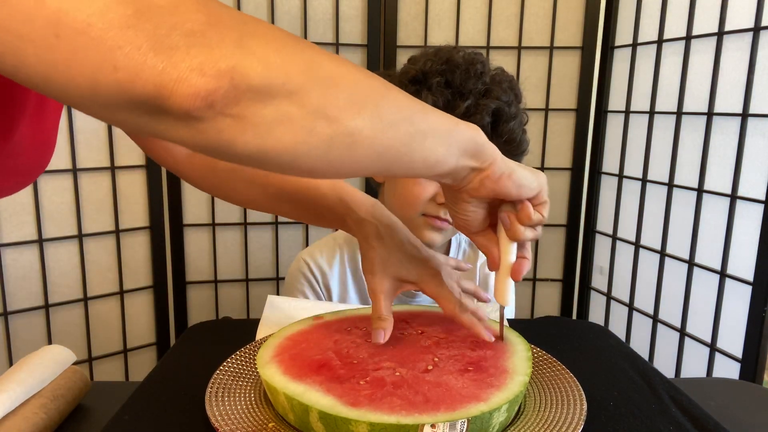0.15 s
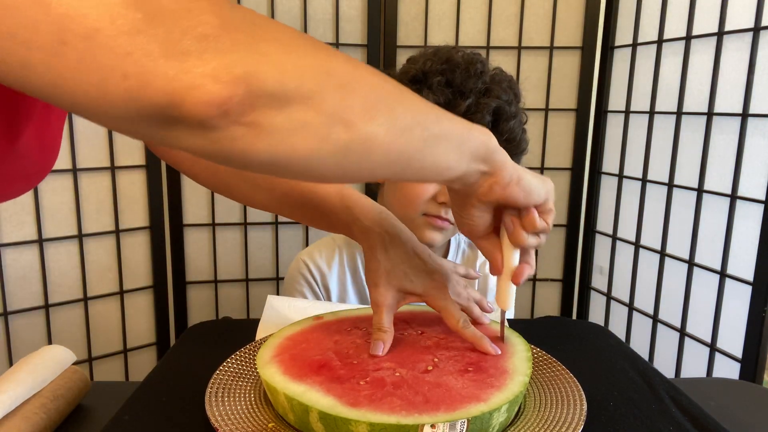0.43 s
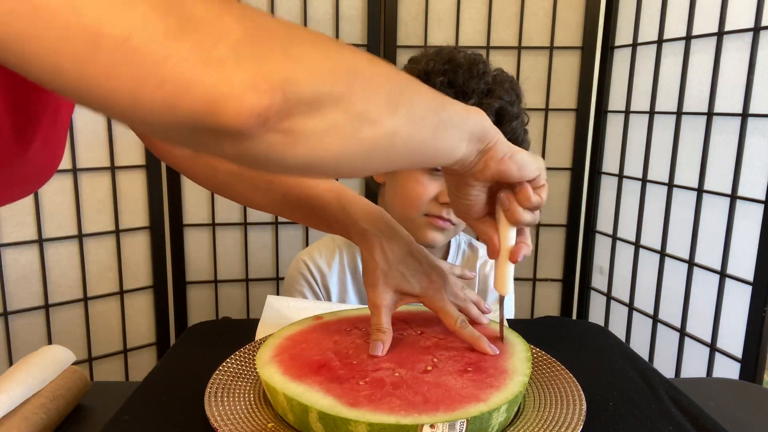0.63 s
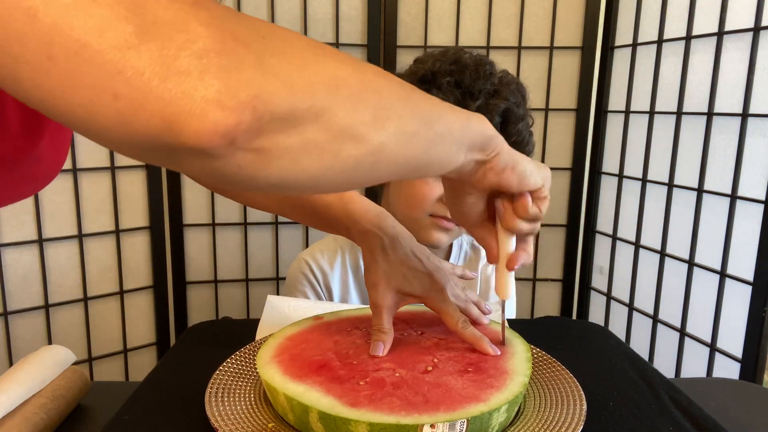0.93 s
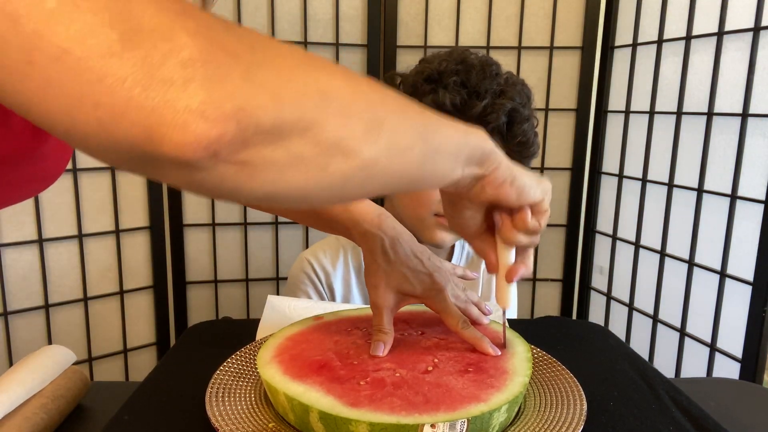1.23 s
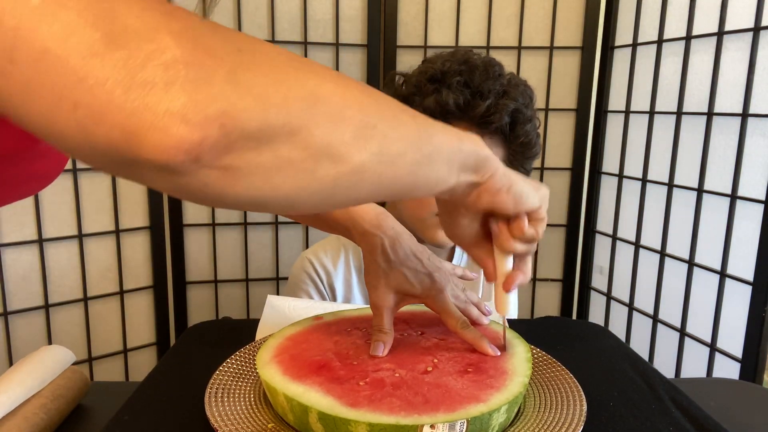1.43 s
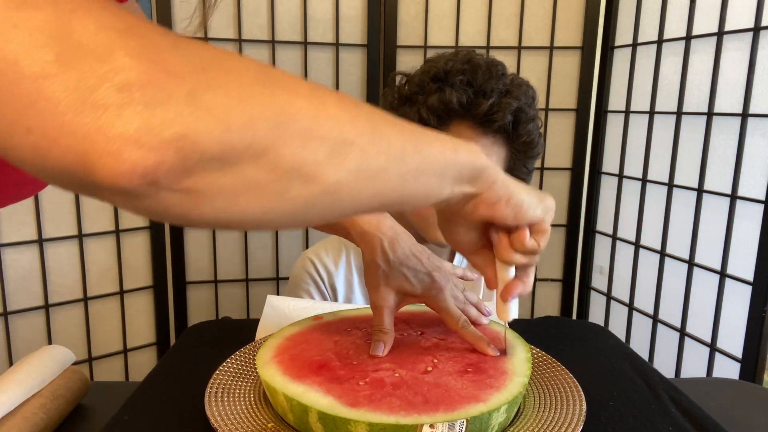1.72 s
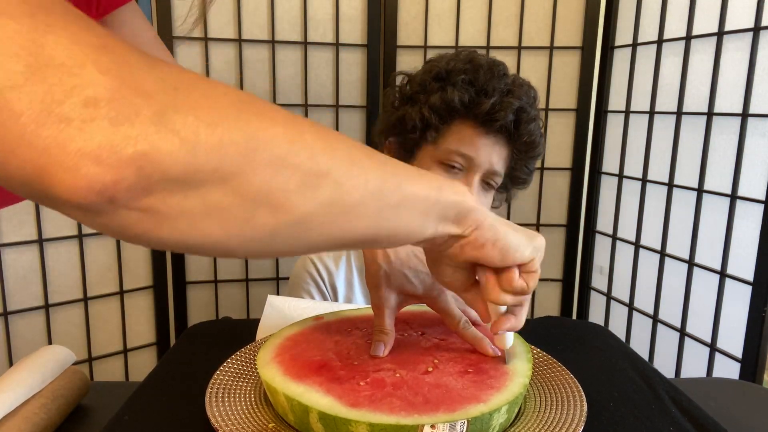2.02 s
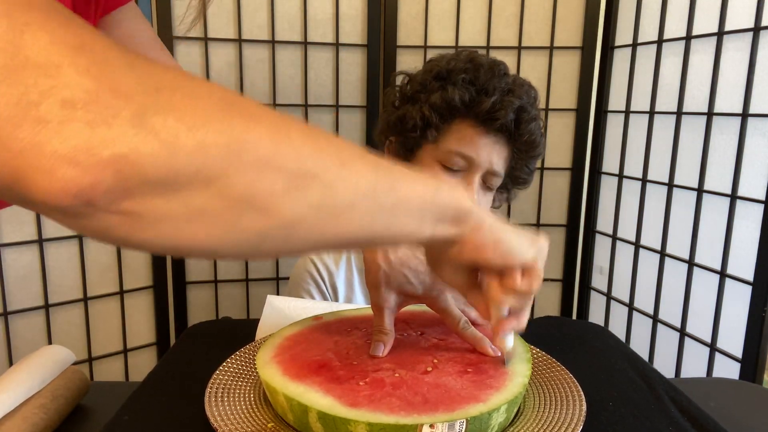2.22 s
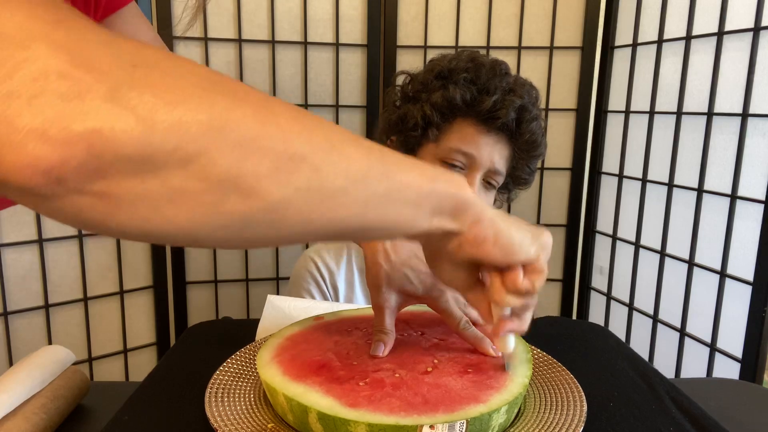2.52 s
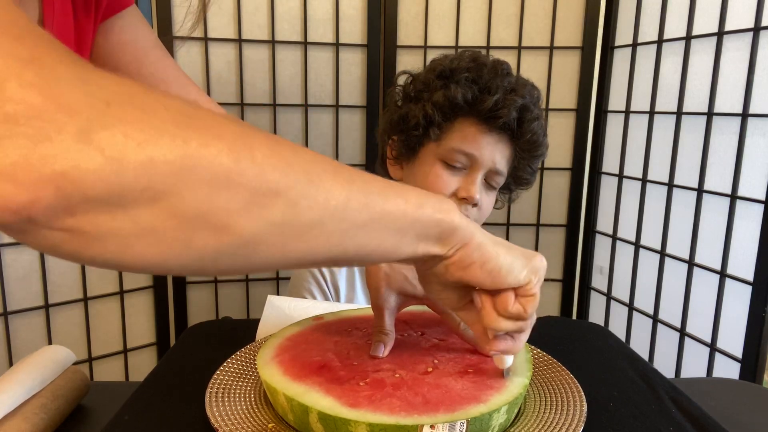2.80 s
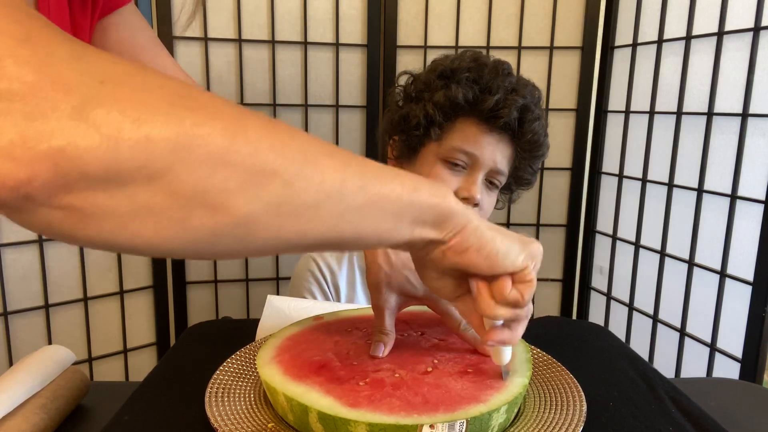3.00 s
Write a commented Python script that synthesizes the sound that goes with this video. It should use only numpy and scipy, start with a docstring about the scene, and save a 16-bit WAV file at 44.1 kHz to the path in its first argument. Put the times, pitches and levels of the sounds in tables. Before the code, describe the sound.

A knife saws through juicy watermelon, short wet rasps each ending with a hard plate knock

```python
"""A knife saws down through a watermelon slab on a plate: strokes fizz as grains of noise that swell and stop.
At most stroke ends the tip knocks the plate: clicks through damped resonances, then a short ring of chattering noise.
Thumps are fading sine waves of the table; a small room answers with early echoes and a noise tail.
Behind it, the table shakes the microphone with a wandering low tone and rumble, over quiet air noise."""
import sys
import numpy as np
from scipy import signal
from scipy.fft import rfft, irfft, next_fast_len
from scipy.io import wavfile
from scipy.ndimage import map_coordinates

SR = 44100
rng = np.random.default_rng(int(sys.argv[2]) if len(sys.argv) > 2 else 0)


def pcm_store(signal):
    """Save signal as 16-bit PCM."""
    levels = np.round(np.clip(np.atleast_2d(signal), -1, 1) * 32767)
    wavfile.write(sys.argv[1], SR, levels.astype(np.int16).T)


def volts(x):
    """Linear amplitude factor 10**(x/20) for a level x in dB, scalar or array-like."""
    e = np.asarray(x, float) / 20
    return 10 ** e


N = 138915

# knife tip on the plate: (t/s, crack blow/dB, pitch of the hollow under the slab f/Hz, hollow level/dB,
# plate ring level/dB, low knock blow/dB, click blow/dB)
KNOCKS = [(0.6655, -18.5, 1337, -44, -57, -29, -26), (0.9807, -22.5, 1240, -48.5, -51.5, -30, -27.5),
          (1.2353, -10.5, 1353, -40, -43.5, -24, -21), (1.4894, -18, 973, -41.5, -48.5, -26, -24),
          (1.7367, -17, 952, -44.5, -46.5, -20, -21), (1.962, -19, 914, -44, -43, -14, -24.5),
          (2.182, -17.5, 936, -42.5, -47, -13, -26), (2.3677, -19, 930, -45.5, -48, -12.5, -29),
          (2.744, -5, 960, -35.5, -36.5, -7.5, -18.5), (2.949, -13.5, 922, -44.5, -44, -11, -25),
          (3.131, -8.5, 955, -37, -39, -6, -23)]
# the tip lands, then skids: (delay/s, level/dB)
SKIDS = [(0, -0.5), (.0014, -5), (.0042, -16.5)]


def slices():
    """Wet cells burst ever louder as the blade speeds up, and the fizz drops away when the stroke ends."""
    # blade through flesh: (end t/s, level at the end/dB, length/s, treble boost/dB)
    strokes = [(0.672, -52.5, 0.077, 2.5), (0.882, -65, 0.075, 3.5), (0.982, -45, 0.052, 3),
               (1.145, -63.5, 0.045, 2.5), (1.238, -42.5, 0.047, 1), (1.497, -43, 0.053, -2.5),
               (1.741, -41, 0.06, -2), (1.962, -41, 0.051, -1), (2.187, -44, 0.042, -1),
               (2.39, -44.5, 0.05, 0.5), (2.59, -53.5, 0.096, -1), (2.659, -62, 0.056, 2),
               (2.749, -42.5, 0.026, 3), (2.961, -48.5, 0.048, 2), (3.14, -49, 0.037, 1)]
    # colour of the wet flesh: (f/Hz, relative level per Hz/dB)
    flesh = [(500, -21), (900, -10.5), (1500, -5), (1900, -8), (2200, -11), (2650, -3), (3200, -8.5),
             (4000, -9.5), (7000, -13.5), (11000, -16.5), (16000, -27)]
    lead_s, release_s = 0.035, 0.0093  # faint start before the swell; quick fade after the end
    swell_db, swell_share = 17.5, 0.6  # rise from entry; most of it takes this share of the stroke
    treble_hz = 4200
    ragged_db, ragged_per_s = 3.1, 170  # uneven tearing
    t = np.arange(N) / SR
    fizz = coloured(grains(9000, spread_db=2), flesh)
    fizz = fizz * volts(ragged_db * wobble(ragged_per_s))
    treble = filtered(fizz, lambda hz: 1 / (1 + (treble_hz / (hz + 1)) ** 4))
    out = np.zeros(N)
    for end, db, length, bright_db in strokes:
        times = [end - length - lead_s, end - length, end - (1 - swell_share) * length, end, end + release_s]
        swell = np.interp(t, times, [-40, -swell_db, -3, 0, -30], left=-200, right=-200)
        out += volts(db + swell) * (fizz + (volts(bright_db) - 1) * treble)
    return out


def juice_ticks():
    """Small wet clicks as the tip is set in, each a landing and one skid through high resonances."""
    # juice ticks: (t/s, blow/dB)
    ticks = [(0.0952, -70), (0.1595, -60), (0.183, -61), (0.1964, -61), (0.414, -59), (0.4598, -59.5),
             (0.5628, -57), (0.5802, -49.5), (2.7235, -57)]
    # wet click resonances: (f/Hz, width/Hz, level/dB)
    wet_click = [(6900, 8300, 1), (12200, 5000, 6)]
    return cracks(ticks, wet_click, SKIDS[:2])


def edge_clicks():
    """The steel edge clicks at each knock: one sharp blow through broad, high resonances."""
    # steel edge resonances: (f/Hz, width/Hz, level/dB)
    edge = [(5140, 2130, 2), (8770, 10400, -1.5), (12000, 6400, -2.5)]
    return cracks([(k[0], k[-1]) for k in KNOCKS], edge, SKIDS[:1])


def knocks(skids):
    """The tip cracks on the plate and sounds the hollow under the slab; a wall echoes the knock."""
    # broad crack: (f/Hz, width/Hz, level/dB)
    crack_bands = [(1822, 543, 2.5), (3580, 2000, -4.5)]
    # upper note of the crack, its blow following the plate's ring level: (f/Hz, width/Hz, level/dB)
    upper_crack = [(2610, 380, 0.0066)]
    # a low 700 Hz echo of the knock off a wall, 13 ms later: (f/Hz, width/Hz, level/dB)
    echo = [(699, 120, 0)]
    upper_db, echo_db, low_db = 37.5, 32.5, 5  # blows over the ring, hollow and low knock columns
    echo_s = 0.013
    low_width = 0.3  # share of the hollow's pitch
    landing = skids[:1]
    out = cracks(KNOCKS, crack_bands, skids, order=2)
    out += cracks([(k[0], k[4] + upper_db) for k in KNOCKS], upper_crack, landing, order=2)
    out += cracks([(k[0] + echo_s, k[3] + echo_db) for k in KNOCKS], echo, landing)
    for s, _, hz, _, _, db, _ in KNOCKS:
        out += cracks([(s, db + low_db)], [(hz, low_width * hz, 0)], landing, order=2)
    return out


def cracks(events, peaks, skids, order=1):
    """Each contact is one or more clicks milliseconds apart through damped resonances; order 2 starts softer."""
    blows = np.zeros(N)
    for event, chance in zip(events, rng.standard_normal((len(events), len(skids), 2))):
        for (lag_s, db), (late, louder) in zip(skids, chance):
            start = event[0] + lag_s * (1 + 0.15 * late)
            blows[round(start * SR)] += volts(event[1] + db + 1.5 * louder)
    return volts(17) * filtered(blows, lambda f: resonances(peaks)(f) ** order)


def plate():
    """After each knock the plate chatters in fixed bands, and the slab's hollow mostly sounds lower over time."""
    # plate bands: (f/Hz, width/Hz, level/dB)
    plate_bands = [(1910, 82, -0.5), (2240, 90, 0), (2510, 140, 6), (2680, 116, 3), (2970, 90, 3),
                   (3164, 340, 0.5)]
    # slab over the plate: (multiple of the hollow's pitch, width as share of that pitch, level/dB)
    hollow = [(0.75, 0.18, 1.5), (1, 0.17, 6.5), (1.27, 0.7, 1)]
    # the slab's low body, the same at every knock: (f/Hz, width/Hz, level/dB)
    body = [(626, 267, 0)]
    body_db = -4  # against the hollow
    body_t60, hollow_t60, plate_t60 = 0.3, 0.46, 0.27  # s to fall by 60 dB, apart from the louder start
    rise_s, first_s, first_db = 0.0049, 0.023, 10.5  # soft onset, then a louder start that fades
    out, t = np.zeros(N + SR), np.arange(SR // 2) / SR
    rise = (1 - np.exp(-t / rise_s)) * volts(first_db * np.exp(-t / first_s))
    drive = grains(2500, spread_db=3)
    for s, _, hz, hollow_db, ring_db, *_ in KNOCKS:
        start = round(s * SR)
        push = drive[start - len(t):][:len(t)]
        hollow_bands = [(hz * k, hz * w, g) for k, w, g in hollow]
        parts = [(hollow_db + body_db, body_t60, body), (hollow_db, hollow_t60, hollow_bands),
                 (ring_db, plate_t60, plate_bands)]
        for db, t60, peaks in parts:
            push = push[::-1]  # turned around so that neighbouring parts chatter differently
            chatter = unit(filtered(push, lambda f: resonances(peaks)(f) ** 2))
            out[start:][:len(t)] += volts(db - 60 * t / t60) * rise * chatter
    return out[:N]


def thumps():
    """Soft pushes ring the table top as a few low sine waves, each fading at its own rate."""
    # table thumps: (t/s, base level/dB, base time to fall by 60 dB/s)
    pushes = [(.664, -36.5, 0.077), (.98, -40, 0.056), (1.202, -40, 0.058), (1.237, -35, 0.054),
              (1.346, -38.5, 0.054), (1.488, -32, 0.075), (1.619, -37.5, 0.038), (1.738, -33.5, 0.065),
              (1.961, -32.5, 0.074), (2.182, -35.5, 0.087), (2.345, -42, 0.044), (2.368, -35.5, 0.076),
              (2.519, -42, 0.049), (2.745, -34.5, 0.075), (2.86, -41, 0.042), (2.949, -37.5, 0.079),
              (3.132, -35.5, .08)]
    # table tones: (f/Hz, level against the base/dB, share of the base fall time)
    table_tones = [(145.7, -3.5, 1.44), (197, 2, 1.16), (253.3, 7, 0.92), (321, -0.65, 0.88),
                   (432, -1.5, 0.3), (532, -8.5, 0.46)]
    out = np.zeros(N)
    chances = rng.standard_normal((len(pushes), len(table_tones), 2))
    for (s, db, t60), chance in zip(pushes, chances):
        t = time_since(s)
        ring = np.zeros(N)
        for (hz, level, share), (louder, turn) in zip(table_tones, chance):
            fade = volts(db + level + 2 * louder - 60 * t / (share * t60))
            ring += fade * np.sin(2 * np.pi * hz * t + 0.4 * turn)  # scattered phase, radians
        out += (1 - np.exp(-t / (0.05 * t60))) * ring  # soft onset
    return out


def room(x, count=11):
    """Early wall echoes and a tail dying by frequency, drawn anew for each of count stretches of time."""
    # wall echoes: (delay/s, level/dB)
    walls = [(.009, -32), (0.017, -18), (0.019, -21)]
    # how long the tail lasts: (f/Hz, time to fall by 60 dB/s)
    tail_times = [(300, 0.94), (1000, 0.46), (2800, 0.48), (7000, 0.36), (14000, 0.42)]
    tail_db = -5
    out = np.zeros(N + SR)
    for part in np.array_split(np.arange(N), count):
        hz, t, z = signal.stft(rng.standard_normal(SR // 2), SR, nperseg=256)
        fade = volts(-60 * t / along(tail_times, hz)[:, None])
        tail = signal.istft(z * fade, SR, nperseg=256)[1]
        tail = volts(tail_db) * tail / np.linalg.norm(tail)
        tail = np.pad(tail, (200, 0))  # samples of silence before the tail
        for delay_s, db in walls:
            tail[round(delay_s * SR)] += volts(db)
        wet = signal.fftconvolve(x[part], tail)
        out[part[0]:part[0] + len(wet)] += wet
    return out[:N]


def background():
    """The table sways as a wandering low tone and rumbles under the working arms; the room's air is noise."""
    # strength of the shaking: (t/s, level/dB)
    shake_levels = [(0.0, -19), (0.03, -33), (1.54, -32), (1.58, -26.5), (1.71, -31.5), (1.849, -25),
                    (1.94, -33.5), (2.02, -24), (2.272, -26.5), (2.3, -38.5), (2.45, -29.5), (2.53, -32.5),
                    (2.609, -25.5), (2.68, -35), (2.81, -19.5), (2.909, -31), (3.029, -19.5), (3.15, -39.5)]
    # rumble colour: (f/Hz, relative level per Hz/dB)
    rumble_colour = [(4, -10.5), (9, 2.5), (20, -4), (27, -9.5), (36, -25.5), (80, -32.5), (130, -35.5),
                     (200, -42), (400, -120)]
    # air colour: (f/Hz, relative level per Hz/dB)
    air_colour = [(24, -55), (40, -5.5), (53, -20), (85, -16.5), (104, -30), (209, -31), (243, -30),
                  (312, -35.5), (680, -48.5), (751, -45), (852, -52.5), (965, -53.5), (16000, -70)]
    sway_hz, sway_wander = 19.44, 0.1998  # middle pitch; size of its random drift (natural log)
    rumble_db, air_db = -2.5, -46.5  # rumble against the sway; air level
    pitch = sway_hz * np.exp(sway_wander * wobble(11))
    sway = np.sqrt(2) * np.sin(2 * np.pi * np.cumsum(pitch) / SR)
    rumble = coloured(rng.standard_normal(N), rumble_colour)
    s, db = np.transpose(shake_levels)
    strength = volts(np.interp(np.arange(N) / SR, s, db))
    air = coloured(rng.standard_normal(N), air_colour)
    return strength * (sway + volts(rumble_db) * rumble) + volts(air_db) * air


def grains(per_s, spread_db):
    """Randomly timed clicks of uneven size on a thin bed of noise."""
    hit = rng.random(N) < per_s / SR
    sizes = rng.standard_normal(N) * volts(spread_db * rng.standard_normal(N))
    return hit * sizes + 0.11 * rng.standard_normal(N)


def resonances(peaks):
    """Frequency response of ringing (f/Hz, width/Hz, level/dB) peaks, with alternating signs."""
    def response(f):
        return sum((-1) ** k * volts(db) * 1j * f * w / (c * c - f * f + 1j * f * w)
                   for k, (c, w, db) in enumerate(peaks))
    return response


def wobble(per_s):
    """A smooth random curve through per_s random points a second."""
    points = rng.standard_normal(int(N * per_s / SR) + 4)
    return map_coordinates(points, [np.arange(N) * per_s / SR])


def time_since(s):
    """Seconds after moment s, zero before it."""
    return np.maximum(np.arange(N) / SR - s, 0)


def unit(x):
    """Scales a sound to an average (rms) strength of 1."""
    return x / np.sqrt(np.mean(x ** 2) + 1e-20)


def along(points, hz):
    """Reads values between (f/Hz, value) points on a log frequency axis."""
    f, v = np.transpose(points)
    return np.interp(np.log(hz + 1), np.log(f + 1), v)


def filtered(x, response):
    """Multiplies the spectrum of x by a response that depends on frequency."""
    m = next_fast_len(len(x) + 8192)
    return irfft(rfft(x, m) * response(np.fft.rfftfreq(m, 1 / SR)), m)[:len(x)]


def coloured(x, spectrum):
    """Gives noise or grains a colour by frequency, at rms 1."""
    return unit(filtered(x, lambda hz: volts(along(spectrum, hz))))


def scene():
    """Fizz, clicks and knocks fill the room; the plate, the table thumps and the background stay dry."""
    fizz = slices() + juice_ticks() + edge_clicks()
    # towards the room, the first contact stands for all skids
    to_room = fizz + volts(-4) * knocks(SKIDS[:1])
    mix = fizz + knocks(SKIDS) + plate() + room(to_room) + thumps() + background()
    return mix[None]


def roll_off(x):
    """The treble ends steeply here."""
    return signal.sosfilt(signal.butter(12, 16510, fs=SR, output="sos"), x)


def record(dry):
    """Keeps only what lies below 15950 Hz."""
    finished = filtered(dry[0], lambda hz: hz < 15950)[None]
    return roll_off(finished)


dry = scene()
out = record(dry)
pcm_store(out)
```